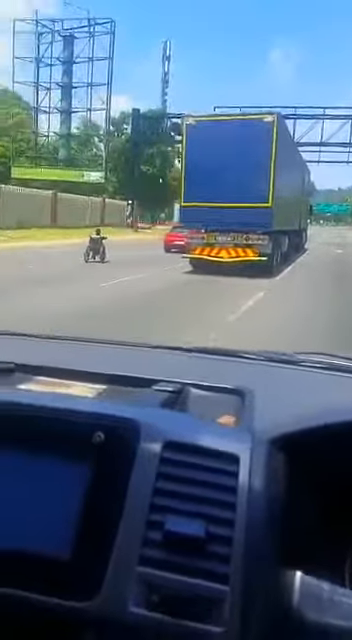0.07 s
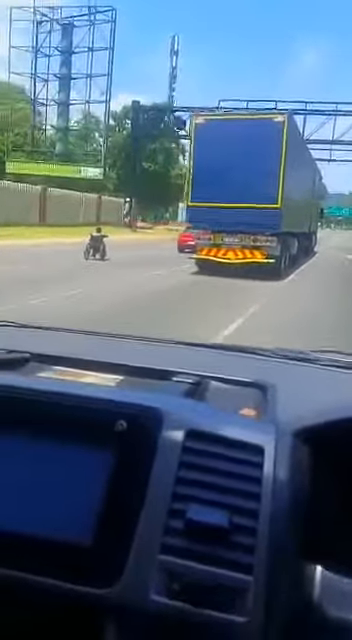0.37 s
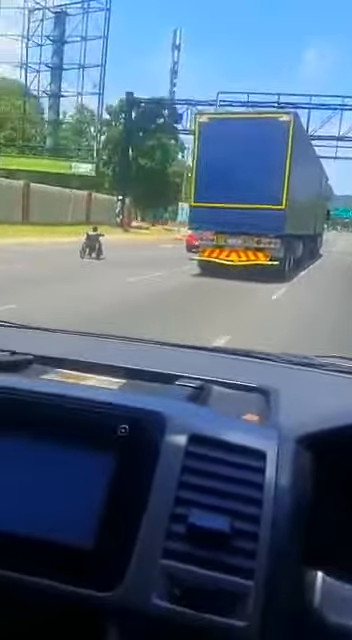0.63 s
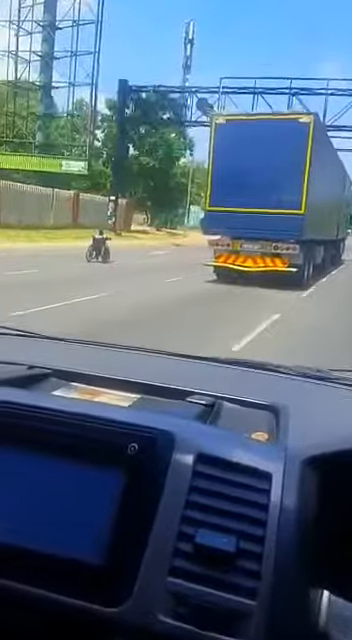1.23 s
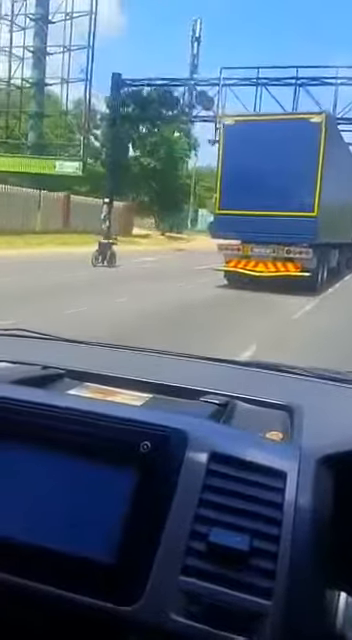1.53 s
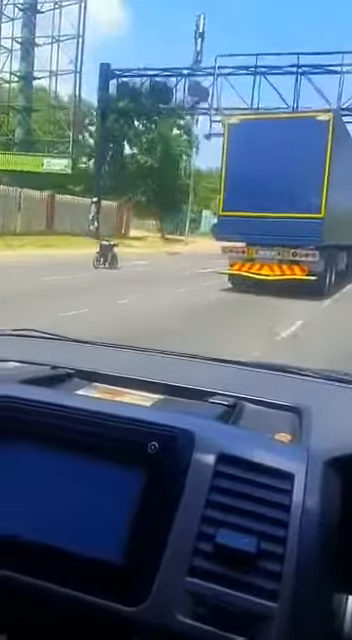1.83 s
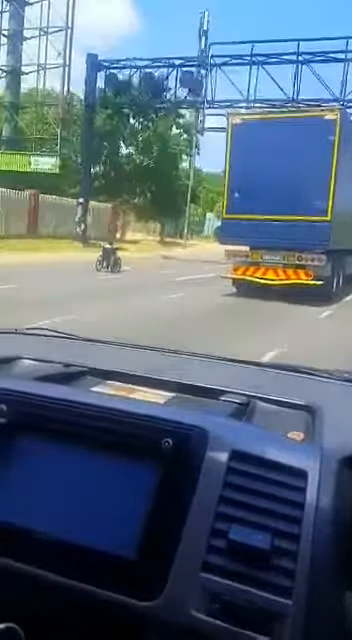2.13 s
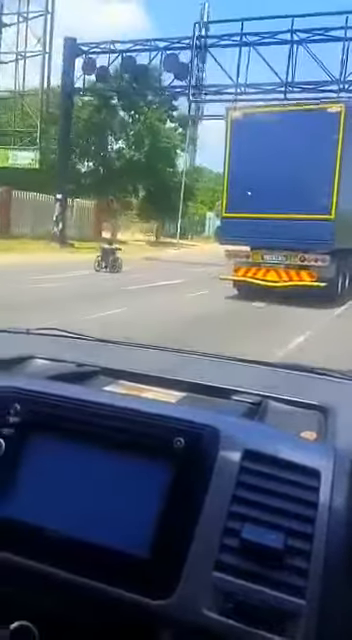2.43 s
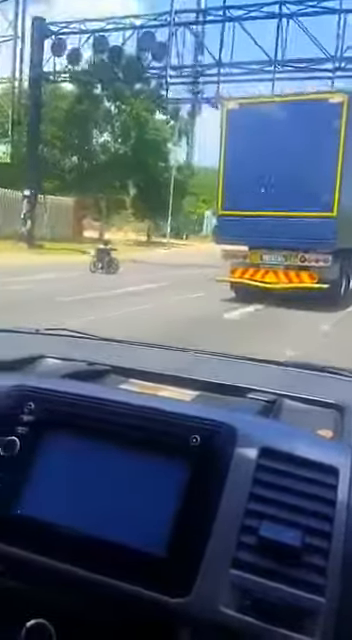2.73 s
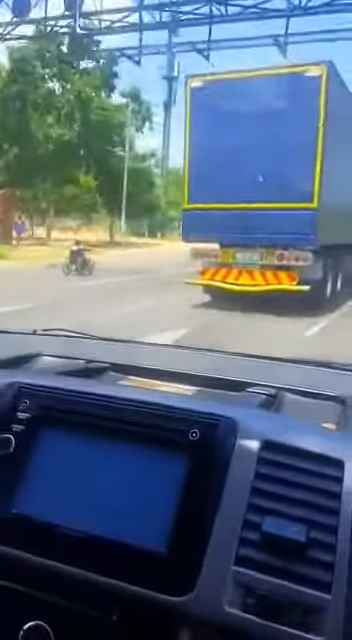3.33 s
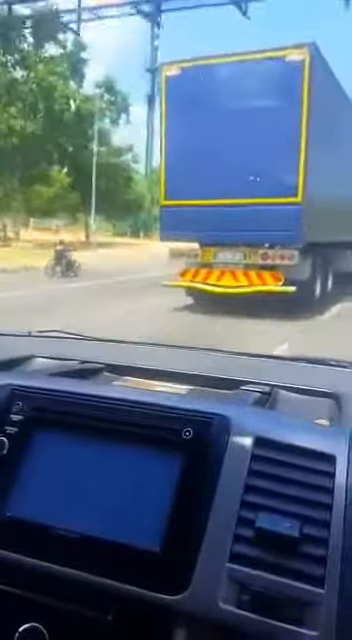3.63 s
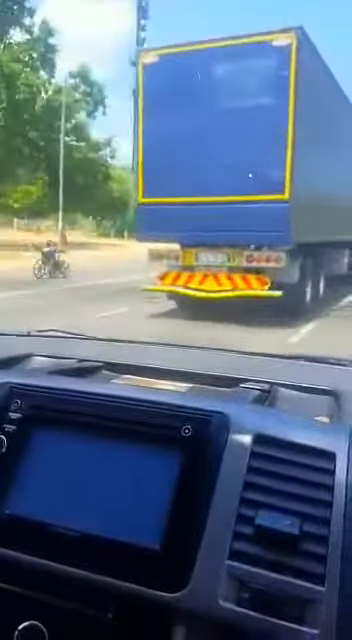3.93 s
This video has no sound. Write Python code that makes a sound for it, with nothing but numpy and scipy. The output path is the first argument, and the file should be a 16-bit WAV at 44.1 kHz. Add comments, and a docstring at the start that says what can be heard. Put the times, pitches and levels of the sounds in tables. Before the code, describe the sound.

A steady low rumble of engine and tyres fills a car cruising on a highway, heard from the dashboard. Air hisses over the windscreen, soft thuds come early and late, and plastic trim ticks faintly near the end.

```python
"""Highway cruise, inside the car

The engine's firing booms in the cabin, the tyres rumble through the body and roar through
the glass, their tread sings, and air hisses over the windscreen. Rough patches of road set
the body droning in soft thuds. Later come a thin sizzle, a brief swish, a faint whistle and
a few ticks of plastic trim. Engine and thuds are wavering sines; the rest is shaped noise."""
import sys
import numpy as np
from scipy import signal
from scipy.fft import rfft, irfft, next_fast_len
from scipy.io import wavfile
from scipy.ndimage import uniform_filter1d, map_coordinates

SR = 44100
rng = np.random.default_rng(int(sys.argv[2]) if len(sys.argv) > 2 else 0)


def persist_wave(psi):
    """Save psi, clipped to +-1, as 16-bit WAV."""
    counts = np.round(np.clip(psi, -1, 1) * 32767).astype(np.int16)
    wavfile.write(sys.argv[1], SR, np.atleast_2d(counts).T)


N = 176400
T = np.arange(N) / SR


def amp(db):
    """Decibels to gain."""
    return 10 ** (np.asarray(db) / 20)


def unit(x):
    """Scale to rms 1."""
    return x / np.sqrt(np.mean(x ** 2) + 1e-20)


def eq_db(points, hz):
    """Read an EQ curve of (freq_hz, gain_db) points on a log frequency axis."""
    freq_hz, gain_db = np.transpose(points)
    return np.interp(np.log(hz + 1), np.log(freq_hz + 1), gain_db)


def curve(points):
    """An automation line through (time_s, value) points, one value per sample."""
    return np.interp(T, *np.transpose(points))


def wobble(rate_hz):
    """A smooth random drift through rate_hz knots a second."""
    knots = rng.standard_normal(int(N * rate_hz / SR) + 4)
    return map_coordinates(knots, [T * rate_hz])


def swells(rows, edge_s):
    """An envelope of (start_s, length_s, level_db) swells, each fading in and out over edge_s."""
    return sum(amp(db) * np.clip(np.minimum(T - start, start + length - T) / edge_s + .5, 0, 1)
               for start, length, db in rows)


def filtered(x, response):
    """Filter x by a gain given as a function of frequency."""
    size = next_fast_len(N + SR // 2)
    hz = np.fft.rfftfreq(size, 1 / SR)
    return irfft(rfft(x, size) * response(hz), size)[:N]


def noise(colour_db, patchy_db=0):
    """Coloured noise of rms 1, with patches of gain drifting over time and frequency."""
    spectrum = signal.stft(rng.standard_normal(N), nperseg=512)[2]
    patches = uniform_filter1d(rng.standard_normal(spectrum.shape), size=7, axis=0)
    patches = unit(uniform_filter1d(patches, size=14, axis=1))
    mottled = signal.istft(spectrum * amp(patchy_db * patches), nperseg=512)[1][:N]
    return unit(filtered(mottled, lambda hz: amp(colour_db(hz))))


def band(centre_hz, width_hz):
    """A noise band of rms 1, width_hz wide at 6 dB down."""
    return noise(lambda hz: -20 * np.log10(1 + (2 * (hz - centre_hz) / width_hz) ** 2))


# Engine firing rate: time_s, pitch_hz
FIRING_RATE = [(0, 51.8), (.25, 50.35), (.9, 49.43), (1.6, 49.64), (2.3, 49.9), (2.7, 50.79), (3.1, 51.6),
               (3.35, 49.26), (3.6, 50.9), (4, 50)]
# Level ride of the cabin boom: time_s, level_db
BOOM_LEVEL = [(0, -22), (.09, -28.5), (.26, -22.5), (.36, -22.5), (.5, -20), (.7, -24.5), (.77, -19.5),
              (.92, -25), (1.15, -20), (1.24, -22.5), (1.39, -20), (1.47, -29.5), (1.58, -21.5),
              (1.82, -21.5), (2.04, -24), (2.12, -21.5), (2.37, -24.5), (2.46, -16.5), (2.68, -20),
              (2.86, -19), (3.15, -22), (3.23, -25.5), (3.3, -19.5), (3.43, -30), (3.48, -20.5),
              (3.59, -21.5), (3.65, -33), (3.76, -22), (3.82, -29.5), (4, -18.5)]
# Overtone balance: firing_multiple, gain_db
OVERTONES = [(2, 0.5), (3, -12.5), (5, -15.5), (6, -25)]
# Level ride of the overtones together: time_s, level_db
OVERTONE_LEVEL = [(0, -44), (.45, -37), (.8, -32.5), (1.25, -34), (2.5, -32.5), (3, -30.5), (3.12, -42),
                  (3.3, -34.5), (4, -35)]

def engine(flutter_db=.9, wander_db=1.5):
    """The firing rate booms in the cabin; its overtones waver above it in level and phase."""
    phase = 2 * np.pi * np.cumsum(curve(FIRING_RATE)) / SR
    boom = amp(curve(BOOM_LEVEL) + flutter_db * wobble(12)) * np.sin(phase)
    overtones = np.zeros(N)
    for multiple, gain_db in OVERTONES:
        gain = amp(gain_db + wander_db * wobble(5.91))
        overtones += gain * np.sin(multiple * phase + .63 * wobble(2.02))
    return np.sqrt(2) * (boom + amp(curve(OVERTONE_LEVEL)) * overtones)


# Bass-heavy tone of the tyres through the body: freq_hz, gain_db
RUMBLE_EQ = [(12, -44), (26, -25), (35, -9), (42, 0), (58, -5.5), (73, 3.5), (88, -6), (110, -6),
             (128, -2.5), (152, -6), (180, -8.5), (260, -13.5), (400, -20.5), (600, -33.5), (1500, -69)]

def tyre_rumble(level_db=-26.5):
    """The tyres rumble through the body as a near-steady low bed."""
    return amp(level_db + .18 * wobble(10.88)) * noise(lambda hz: eq_db(RUMBLE_EQ, hz))


# Midrange tone of the tyres through the glass: freq_hz, gain_db
ROAR_EQ = [(150, -38), (260, -6.5), (370, -1), (450, -1), (640, -6), (830, -4), (1060, -0.5), (1300, -1.5),
           (1620, -4), (1850, -8.5), (2100, -14.5), (2300, -12), (3600, -41), (6000, -57)]
# Cabin resonances: centre_hz, width_hz, boost_db
CABIN_RESONANCES = [(395, 44, 4), (484, 14, 5.5), (582, 19, 6.5), (709, 134, 5.5), (914, 74, 2.5),
                    (1027, 72, 2), (1617, 63, 1.5)]
# Level ride of the roar: time_s, level_db
ROAR_LEVEL = [(0, -35), (.7, -37), (1.8, -35.5), (2.8, -35.5), (4, -36.5)]

def tyre_roar():
    """The tyres roar through the glass and excite the cabin's resonances."""
    def colour_db(hz):
        peaks_db = sum(boost_db / (1 + (2 * (hz - centre_hz) / width_hz) ** 2)
                       for centre_hz, width_hz, boost_db in CABIN_RESONANCES)
        return eq_db(ROAR_EQ, hz) + peaks_db
    return amp(curve(ROAR_LEVEL) + .8 * wobble(14)) * noise(colour_db, patchy_db=.24)


# Level ride of the singing tread: time_s, level_db
TREAD_LEVEL = [(0, -58), (1.1, -42.5), (1.3, -55), (2, -49), (2.55, -59), (2.78, -42), (3.1, -43.5),
               (3.5, -50), (3.8, -45), (4, -42)]

def tread_song(lower_hz=1073, upper_hz=1314, width_hz=120, upper_db=-11):
    """The tread sings in two narrow bands, rising and falling with the road surface."""
    song = band(lower_hz, width_hz) + amp(upper_db) * band(upper_hz, width_hz)
    return amp(curve(TREAD_LEVEL) + .67 * wobble(6.4)) * song


# Bright tone of air on the windscreen: freq_hz, gain_db
HISS_EQ = [(800, -8), (1900, 5), (2150, -0.5), (2450, 2.5), (2800, 2.5), (3200, -1), (3650, -5.5),
           (3950, -3), (4300, -3.5), (4750, -2), (5600, -8.5), (8000, -11), (9700, -13.5), (10500, -14),
           (11800, -16.5), (14000, -18.5)]
# Level ride of the hiss: time_s, level_db
HISS_LEVEL = [(0, -48), (.4, -47), (1.8, -47), (2.4, -47), (3, -48), (3.45, -49), (3.7, -51), (4, -51.5)]

def windscreen_hiss():
    """Air streams over the windscreen in a smooth hiss."""
    gain = amp(curve(HISS_LEVEL) + .22 * wobble(11))
    return gain * noise(lambda hz: eq_db(HISS_EQ, hz), patchy_db=1.55)


# Level and sweep of the rushing air: time_s, level_db, centre_hz
RUSH_SWEEP = [(0, -53, 2750), (1.5, -53.5, 2750), (1.92, -56.5, 2843), (2.01, -47, 3050), (2.2, -47, 2950),
              (2.319, -51, 2750), (2.7, -53, 2713), (3.4, -54, 2655), (3.6, -54, 2580), (4, -60, 2630)]

def air_rush(width_hz=720):
    """A focused rush of air swells, sinks in pitch and dies away."""
    level_db = curve([(s, db) for s, db, hz in RUSH_SWEEP])
    centre_hz = curve([(s, hz) for s, db, hz in RUSH_SWEEP])
    phase = 2 * np.pi * np.cumsum(centre_hz) / SR
    # Two low noises, shifted up into one band around the moving centre.
    rush = band(0, width_hz) * np.cos(phase) + band(0, width_hz) * np.sin(phase)
    return amp(level_db + .73 * wobble(14)) * rush


# Level ride of the hum: time_s, level_db
HUM_LEVEL = [(0, -52), (1.2, -45.5), (1.6, -51), (2.5, -43), (2.9, -63), (4, -49)]

def cabin_hum():
    """A faint hum in the cabin: noise so narrow that it becomes a wavering tone."""
    return amp(curve(HUM_LEVEL)) * band(centre_hz=499, width_hz=4.8)


# Rough patches of road: start_s, length_s, level_db, pitch_hz
ROUGH_PATCHES = [(0.517, 0.14, -29.5, 68.3), (0.723, 0.41, -26, 75.5), (2.89, 0.16, -27, 74.2),
                 (3.424, 0.135, -26, 68.6)]

def road_thuds():
    """Each rough patch sets the body droning briefly on one low, slightly unsteady note."""
    out = np.zeros(N)
    for start_s, length_s, level_db, pitch_hz in ROUGH_PATCHES:
        drone = np.sqrt(2) * np.sin(2 * np.pi * pitch_hz * T + .5 * wobble(12))
        out += swells([(start_s, length_s, level_db)], edge_s=.03) * drone
    return out


# Wisps of top-end hiss: start_s, length_s, level_db, centre_hz, width_hz
SIZZLES = [(1.7, .19, -64, 13860, 160), (1.93, .14, -60, 13760, 450), (2.407, .15, -57, 13620, 748.5)]

def sizzle():
    """A thin, very high hiss comes and goes."""
    return sum(swells([(start_s, length_s, level_db)], edge_s=.06) * band(centre_hz, width_hz)
               for start_s, length_s, level_db, centre_hz, width_hz in SIZZLES)


# Head and tail of the swish: start_s, length_s, level_db
SWISH_SWELLS = [(1.995, 0.069, -44), (2.085, 0.15, -48.5)]
# Bright tone of the swish: freq_hz, gain_db
SWISH_EQ = [(900, -31), (2200, -8), (3000, 3), (3800, 1.5), (4700, 5.5), (6200, -1.5), (8500, -1),
            (10500, -9.5), (14000, -4)]

def swish(grain_db=1.1):
    """Two overlapping swells of noise make one soft, slightly grainy swish."""
    envelope = swells(SWISH_SWELLS, edge_s=.079) * amp(grain_db * wobble(120))
    return envelope * noise(lambda hz: eq_db(SWISH_EQ, hz))


# Faint whistles: start_s, length_s, level_db
WHISTLES = [(3.3, 0.14, -66), (3.53, 0.1, -65)]

def whistle():
    """A narrow band of noise whistles twice, thin and high."""
    return swells(WHISTLES, edge_s=.04) * band(centre_hz=6713, width_hz=170)


# Ticks of the trim: start_s, level_db, centre_hz, half_width_octaves, t60_s
TRIM_TICKS = [(3.398, -40.5, 3450, 0.14, 0.08), (3.404, -51, 5500, .8, 0.057), (3.466, -46, 5150, .7, .05),
              (3.478, -48, 6000, .9, 0.068), (3.786, -40, 6500, 1.2, 0.039),
              (3.803, -46, 5000, 0.42, 0.067)]

def trim_ticks(attack_s=.0018):
    """Plastic trim ticks: each is a fast-decaying noise burst in one broad resonance."""
    out = np.zeros(N)
    for start_s, level_db, centre_hz, octaves, t60_s in TRIM_TICKS:
        age_s = np.maximum(T - start_s, 0)
        envelope = amp(level_db - 60 * age_s / t60_s) * (1 - np.exp(-age_s / attack_s))
        ring = noise(lambda hz: -20 * np.log10(1 + (np.log2((hz + 1) / centre_hz) / octaves) ** 2))
        out += envelope * ring
    return out


# Early reflections, inverted where the gain is negative: delay_s, gain
REFLECTIONS = [(.002265, -.11), (.00296, .08), (.00412, .09), (.00485, -.09), (.00561, .11), (.00673, .07)]

def cabin_reflections(x):
    """Glass and dashboard add short echoes that comb-filter the sound."""
    def comb(hz):
        return 1 + sum(gain * np.exp(-2j * np.pi * hz * delay_s) for delay_s, gain in REFLECTIONS)
    return filtered(x, comb)


def scene():
    """The mono mix at the dashboard; tyre noise, air and swish also bounce around the cabin."""
    boom = engine()
    road = tyre_rumble() + road_thuds() + tyre_roar()
    air = windscreen_hiss() + air_rush()
    reflected = cabin_reflections(road + air + swish())
    details = tread_song() + cabin_hum() + whistle() + sizzle() + trim_ticks()
    return (boom + reflected + details)[None]


def record(dry):
    """The phone's band limit: a brick-wall cut of the highest treble."""
    cutoff_hz = 13950
    return np.array([filtered(x, lambda hz: hz < cutoff_hz) for x in dry])


dry = scene()
out = record(dry)
persist_wave(out)
```